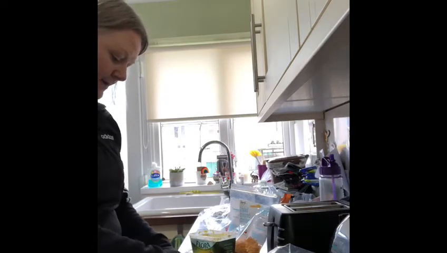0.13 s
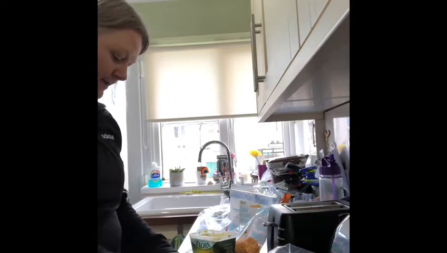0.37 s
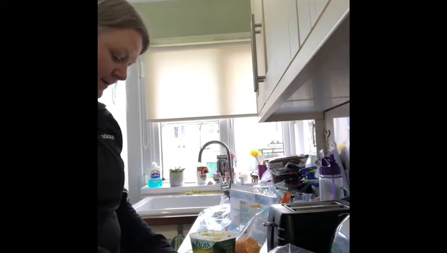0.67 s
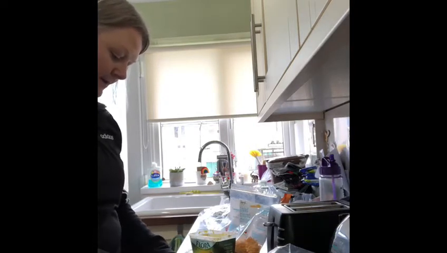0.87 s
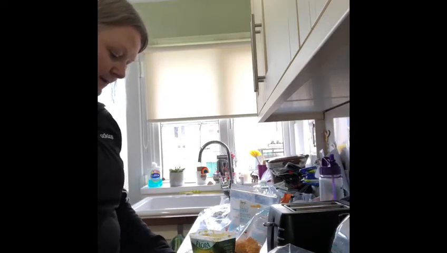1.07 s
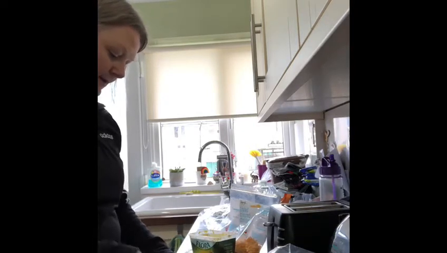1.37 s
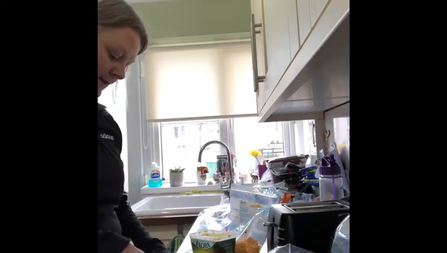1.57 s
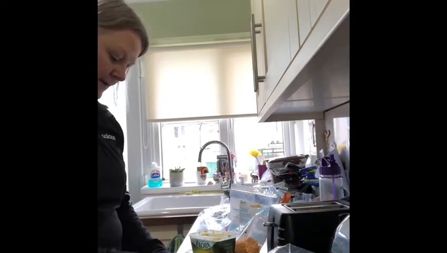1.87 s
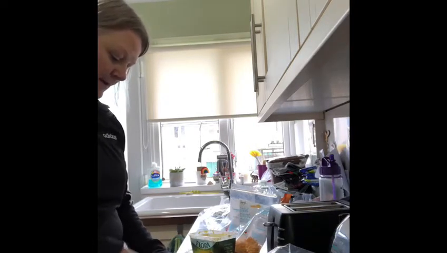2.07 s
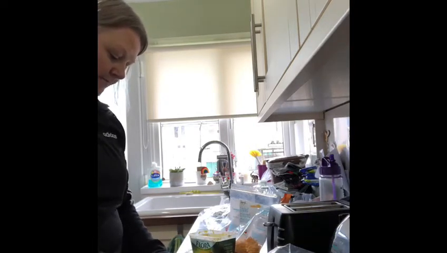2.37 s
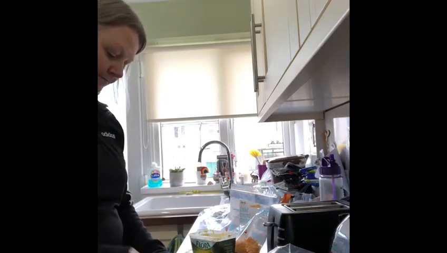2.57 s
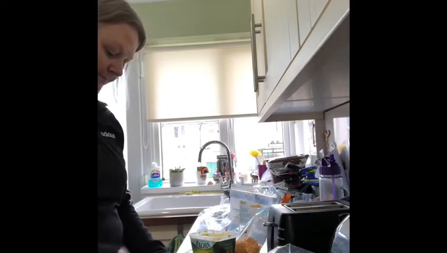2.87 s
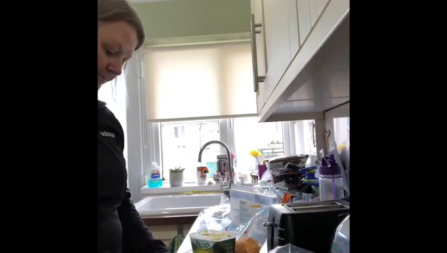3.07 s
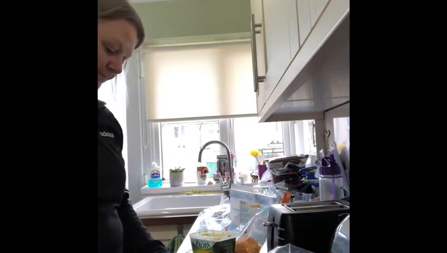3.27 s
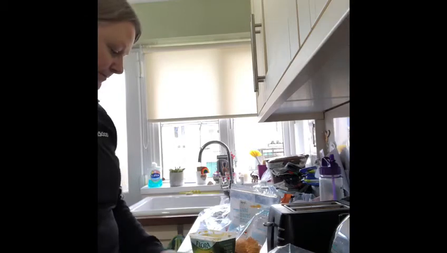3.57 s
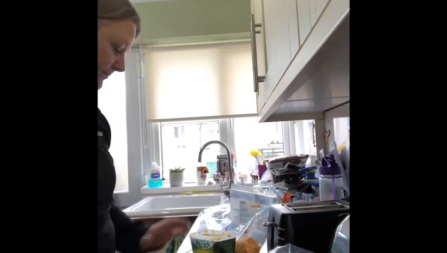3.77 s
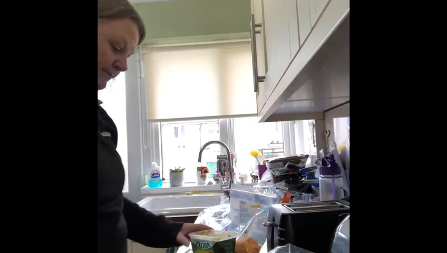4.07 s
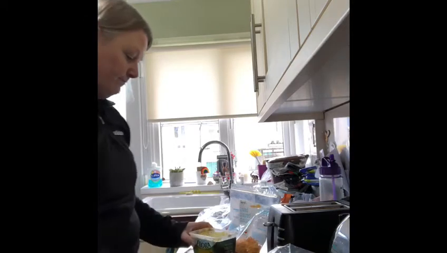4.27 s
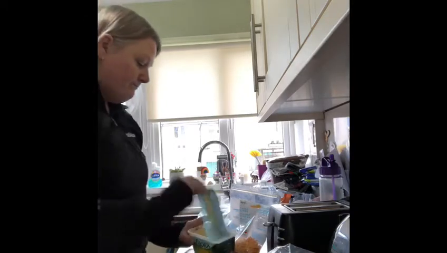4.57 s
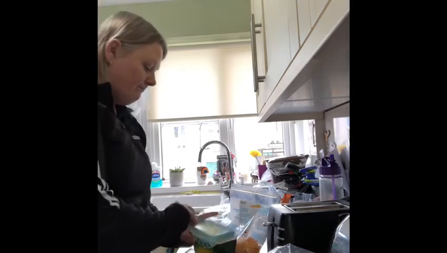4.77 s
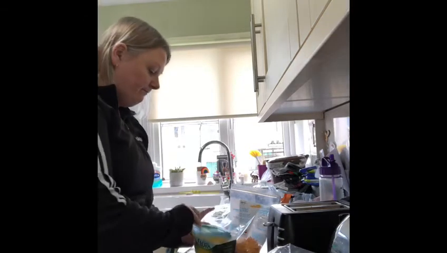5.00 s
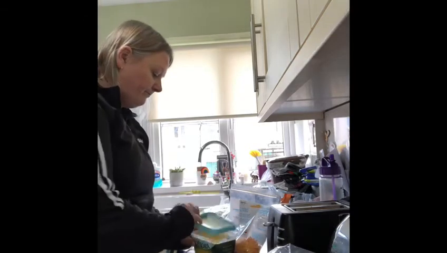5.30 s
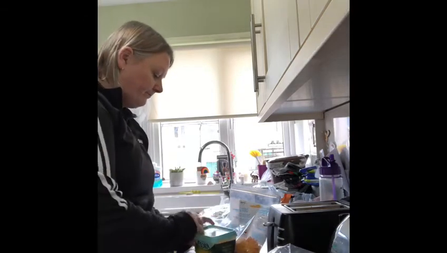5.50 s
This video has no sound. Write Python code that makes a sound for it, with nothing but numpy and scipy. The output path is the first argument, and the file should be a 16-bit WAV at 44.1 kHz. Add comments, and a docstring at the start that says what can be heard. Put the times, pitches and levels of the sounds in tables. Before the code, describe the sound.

Brittle toast crackles under a table knife, stroke after stroke, with small crumb snaps and dull hand thumps on the counter. Two light clinks lead to the knife being put down hard on the plate, the loudest moment. Then a plastic butter tub clicks and creaks, and its lid slides and pops into place. Close microphone, short room reflections, faint steady hush.

```python
"""A table knife spreads butter over dry toast in a small kitchen, close by: the room stays below the direct sound.
Each stroke is a swell of random tiny fractures that breaks crumbs, rings the blade and drums on the worktop.
The blade clinks twice on the plate, then is put down with a clatter: ringing modes over a crack and a thud.
The plastic butter tub is gripped, and its lid is slid over the worktop, fitted and pressed shut:
filtered grains for the rubbing, short chatters and hollow air notes for the clicks, snaps and knocks."""
import sys
import numpy as np
from scipy import signal
from scipy.fft import rfft, irfft
from scipy.io import wavfile
from scipy.ndimage import uniform_filter1d

SR = 44100
rng = np.random.default_rng(int(sys.argv[2]) if len(sys.argv) > 2 else 0)


def persist_wave(psi):
    """Save psi, clipped to +-1, as 16-bit WAV."""
    counts = np.round(np.clip(psi, -1, 1) * 32767).astype(np.int16)
    wavfile.write(sys.argv[1], SR, np.atleast_2d(counts).T)


N = 248707
TIME = np.arange(N) / SR
BLOW_TIME = TIME[:SR // 3]  # longest a single blow may last

# Strokes of the knife, levels at full pressure; softening is the fall of the crust as butter coats it:
# start_s, attack_s, hold_s, release_s, crust_db, softening_db_per_s, crumbs_db, plate_db, whistle_db
KNIFE_STROKES = [ (0.0, 0.00069, 0.003, 0.047, -44, 30, -45.5, -55.5, -58.5),
                 (.21, 0.053, 0.13, 0.045, -41.5, 62, -49, -57.5, -67),
                 (0.576, .055, 0.078, 0.11, -42, 49, -47, -53, -63),
                 (0.94, 0.051, .10, .06, -50, 2, -52, -54.5, -66),
                 (1.276, .12, 0.039, .02, -65, 0, -74.5, -62, -92),
                 (1.442, 0.017, 0.14, 0.037, -49.5, -10, -50.5, -58.5, -65),
                 (1.816, 0.0099, 0.025, 0.078, -41.5, 46, -51, -55.5, -59),
                 (1.898, 0.048, 0.077, 0.074, -54.5, 10, -57.5, -59.5, -68),
                 (2.243, 0.0021, 0.061, 0.039, -47.5, 30, -55, -59, -60),
                 (2.31, 0.034, 0.014, 0.1, -52, 30, -57, -59.5, -69),
                 (2.604, .003, 0.12, 0.09, -62, 25, -66.5, -65, -76),
                 (3.035, 0.0054, 0.0066, 0.032, -55, 25, -58, -56, -68),
                 (3.127, .04, 0.0085, .005, -63, 0, -67, -69, -79)]
# Colour of the breaking crust: pitch_hz, level_db
CRUST_COLOUR = [(200, -37.5), (600, -15.5), (1000, -9), (1250, 1.5), (1900, -2), (2500, 1), (3400, -0.5),
                (5000, -7.5), (8000, -22), (12000, -34)]
# Colour of its finest crumbs: pitch_hz, level_db
CRUMB_COLOUR = [(1000, -42.5), (3000, 1.5), (4900, 5.5), (6500, 0), (8400, -2.5), (9300, -5.5),
                (11300, -10), (12500, -19)]
# Colour of the worktop, heard in strokes, thumps and clinks: pitch_hz, level_db
WORKTOP_COLOUR = [(25, -39), (42, -5.5), (58, -1.5), (85, -10), (120, 0.5), (190, -1), (290, -12.5),
                  (500, -19.5), (1500, -53)]
# Colour of the plate under the toast: pitch_hz, level_db
PLATE_BODY_COLOUR = [(150, -17), (320, -11), (440, 2.5), (660, 1.5), (900, 6), (1100, -4), (2000, -33)]
# Thin whistle of the blade's edge: pitch_hz, level_db
WHISTLE_COLOUR = [(9000, -58), (10600, -12), (11080, 4), (11500, -37), (12500, -39)]
# Worktop rumble at a firm crust level, its share of the crust's dB, and its swell as the hand leans in
RUMBLE_DB, FIRM_CRUST_DB, RUMBLE_SHARE, LEANING_DB_PER_S = -62, -45, .35, 36


def buttering():
    """The blade breaks crust and crumbs in uneven catches, and shakes plate and worktop through the toast."""
    crust = crumbs = rumble = body = whistle = 0
    for *move, crust_db, softening_db_per_s, crumbs_db, plate_db, whistle_db in KNIFE_STROKES:
        rumble_db = RUMBLE_DB + RUMBLE_SHARE * (crust_db - FIRM_CRUST_DB)
        crust = crust + contact(move, crust_db, -softening_db_per_s)
        crumbs = crumbs + contact(move, crumbs_db)
        rumble = rumble + contact(move, rumble_db, LEANING_DB_PER_S)
        body = body + contact(move, plate_db)
        whistle = whistle + contact(move, whistle_db)

    catches = undb(1.96 * wander(rate=130))  # the edge sticks and lets go
    fractures = unit(catches * grains(rate=2200, spread_db=2.5))
    extra_dust = catches * grains(rate=7000, spread_db=4.0)
    dust = unit(fractures + 1.17 * extra_dust)

    crunch = crust * unit(colour(fractures, CRUST_COLOUR)) + crumb_snaps()
    crunch = .82 * crunch + .42 * np.std(crunch) * unit(pressed_blade(crunch))
    drumming = rumble * unit(colour(grains(rate=600, spread_db=2), WORKTOP_COLOUR))
    plate = body * unit(colour(fractures, PLATE_BODY_COLOUR))
    fine_crumbs = crumbs * unit(colour(dust, CRUMB_COLOUR))
    edge = whistle * unit(colour(dust, WHISTLE_COLOUR))
    return crunch + drumming + plate + fine_crumbs + edge


# Larger bits of crust give way, levels before the blade's ring is mixed in: start_s, level_db
CRUST_SNAPS = [(0.212, -50), (0.2303, -47), (.284, -45), (.6428, -42), (0.6797, -53), (.829, -56),
               (0.9375, -65), (0.953, -51), (1.0107, -55), (1.0792, -50.5), (1.335, -58), (1.448, -59.5),
               (1.573, -49), (2.254, -44), (2.609, -55)]
SNAP_DUST_DB = -13  # fine crumbs that fly with a snap, relative to it


def crumb_snaps():
    """A larger bit breaks with one sharp touch and a very short chatter, throwing fine crumbs."""
    out = np.zeros(N)
    for s, db in CRUST_SNAPS:
        snap = impact(0.0033, first=0.82)
        add(out, s, blow(colour(snap, CRUST_COLOUR), db))
        add(out, s, blow(colour(snap, CRUMB_COLOUR), db + SNAP_DUST_DB))
    return out


# Blade and plate, damped by the toast pressed between them: pitch_hz, width_hz, level_db
PRESSED_MODES = [(1580, 21, -19), (1747, 110, 6.5), (1948, 29, 0), (2070, 62, 3.5), (2440, 280, 3.5),
                 (3135, 26, -7.5), (5030, 99, -18)]


def pressed_blade(crunch):
    """Every fracture rings the damped blade; as the contact travels, its modes swell independently."""
    ring = 0
    for mode in PRESSED_MODES:
        swell = undb(4 * wander(rate=14))
        ring = ring + convolve(crunch, resonances([mode])) * swell
    return ring


# The weight of the hand comes down on the worktop: start_s, level_db
HAND_THUMPS = [(0.701, -48), (0.939, -47.5), (2.32, -45), (2.62, -48), (3.049, -46), (4.017, -42.5)]


def hand_thumps():
    """The worktop answers the weight of the hand with a dull swell."""
    out = np.zeros(N)
    for s, db in HAND_THUMPS:
        add(out, s, thud(WORKTOP_COLOUR, db))
    return out


# Knife touches the plate, place 0 tip, 1 edge, 2 flat; chatter is that of the crack:
# start_s, place, clank_db, crack_db, thud_db, chatter_t60_s
PLATE_CLINKS = [(2.7814, 0, -37, -41.5, -57.5, 0.059), (3.1814, 1, -35, -37.5, -53.5, 0.02),
                (3.538, 2, -49, -52.5, -64, 0.068), (3.5487, 2, -24, -20, -40, 0.065),
                (3.5654, 2, -21.5, -28, -38, 0.052), (3.5744, 2, -29, -29.5, -54.5, 0.042)]
# Dry crack of steel on the plate: pitch_hz, level_db
CRACK_COLOUR = [(150, -25.5), (300, -19), (500, 3), (900, 3.5), (1300, 0), (2400, 2), (4200, 4),
                (5200, -9.5), (7500, -18), (9400, -10), (10200, -34), (11400, -33.5)]
FREE_RING_DB = -3  # ringing after the two part, relative to the clank


def knife_on_plate(touching_width_hz=110):
    """Steel chatters on the plate: a dry crack, a clank damped by touching, free ringing and a thud."""
    out = np.zeros(N)
    modes = np.array(PLATE_MODES)
    for s, place, clank_db, crack_db, thud_db, chatter_t60 in PLATE_CLINKS:
        mode_db = modes[:, 2 + int(round(place))]
        damped = resonances([(hz, touching_width_hz, db) for hz, db in zip(modes[:, 0], mode_db)])
        clank = convolve(impact(2.1 * chatter_t60, first=0.2), damped)
        crack = colour(impact(chatter_t60, first=0.18), CRACK_COLOUR)
        add(out, s, blow(plate_ring(mode_db), clank_db + FREE_RING_DB))
        add(out, s, blow(clank, clank_db))
        add(out, s, blow(crack, crack_db))
        add(out, s, thud(WORKTOP_COLOUR, thud_db))
    return out


# Blade and plate together, clean t60 before butter shortens it; levels depend on where they touch:
# pitch_hz, t60_s, tip_db, edge_db, flat_db
PLATE_MODES = [ (427.7, 0.13, -24, -25, -4), (663, 0.034, -2, 6.5, -12.5), (803, .14, 6, -1, -16.5),
               (930, 0.18, -23, -2.5, -10), (968, .14, -28, -19, -5.5), (1400, 0.082, -21, -9, -8.5),
               (1586, 0.092, 7, -10, -16), (1890, 0.23, -25, -1, -12.5), (2080, 0.087, -33, -13, -6),
               (2400, 0.14, -19, -22, -5.5), (2800, 0.35, -7, -26, -32.5), (3118, 0.071, -17, 4.5, 2),
               (3100, 0.047, 8, -13, -9.5), (3170, .19, 1, -11, -10.5), (3380, .13, -12, 4.5, -22.5),
               (3500, .13, -24, -32, -31.5), (4090, .15, -10, -23, -4.5), (4320, .11, -31, -9, -9.5),
               (4370, 0.15, -26, -21, -13), (4450, .19, -11, -12, -5), (5820, 0.091, 2.5, -4, -12.5),
               (5960, 0.11, -24, 1.5, 3), (6030, 0.081, 2, -1, -13.5), (7000, .15, -6, 1, -4),
               (7680, 0.21, -26, -2, -3.5), (8500, 0.11, -28, -34, -9), (9000, .14, -30, -9, -10),
               (9490, 0.21, -10, -2, -9.5), (11000, 0.1, -34, -6, -17.5), (11360, 0.12, -30, -3, -9.5)]


def plate_ring(mode_db, split_hz=40, twin_db=-6, loss_hz=28000):
    """Free ringing: each mode beats against a weaker twin at most split_hz away."""
    ring = 0
    for (hz, t60, *_), db in zip(PLATE_MODES, mode_db):
        pair_hz = hz + np.array([0, split_hz * rng.uniform(-1, 1)])
        phases = np.outer(pair_hz, BLOW_TIME) + rng.random((2, 1))
        main, twin = np.sin(2 * np.pi * phases)
        buttered_t60 = t60 / (1 + hz / loss_hz)  # butter damps the high modes most
        ring = ring + undb(db) * fade(buttered_t60) * (main + undb(twin_db) * twin)
    return ring * (1 - fade(.006))


# The wall of the tub clicks as fingers tighten on it: start_s, level_db
TUB_WALL_CLICKS = [(4.0138, -62), (4.024, -56), (4.0342, -41.5), (4.044, -54), (4.0777, -50), (4.092, -55),
                   (4.1046, -42), (4.1198, -53)]
# What a click sets off: air pitch, hollow note and rim relative to the click, chatter
CLICK_CAVITY_HZ, CLICK_HOLLOW_DB, CLICK_RIM_DB, CLICK_T60_S = 1320, 2.5, -25, 0.01


def wall_clicks():
    """Thin plastic ticks under the fingers, with a trace of rim and a hollow note of the air inside."""
    out = np.zeros(N)
    for s, db in TUB_WALL_CLICKS:
        add(out, s, plastic(TICK_COLOUR, CLICK_T60_S, db))
        add(out, s, plastic(RIM_COLOUR, CLICK_T60_S, db + CLICK_RIM_DB))
        add(out, s, hollow_note(CLICK_CAVITY_HZ, CLICK_T60_S, db + CLICK_HOLLOW_DB))
    return out


# The rim of the lid catches and snaps; chatter is that of the plastic:
# start_s, cavity_hz, snap_db, hollow_db, chatter_t60_s
LID_RIM_SNAPS = [(4.525, 1180, -34, -43.5, 0.031), (4.53, 467, -42.5, -42, 0.056),
                 (4.5412, 460, -31.5, -44, 0.023), (4.714, 1130, -43, -48.5, 0.056),
                 (4.9555, 870, -46.5, -53, 0.021), (5.004, 856, -44, -44.5, 0.029),
                 (5.021, 920, -44.5, -44.5, 0.083), (5.0398, 850, -43, -47, 0.035),
                 (5.3373, 950, -44, -34.5, 0.017), (5.3558, 845, -37, -39.5, .022)]
# Base of the tub on the worktop, also heard under the knocks: pitch_hz, level_db
TUB_BASE_COLOUR = [(30, -47.5), (60, -16), (100, -8), (150, 1.5), (250, -3.5), (400, -21), (1500, -50)]
SNAP_TICK_DB, SNAP_THUD_DB = -4.5, -14  # tick relative to the snap, thud relative to the hollow note


def rim_snaps():
    """The rim snaps and ticks, pushes the air in the tub and jolts its base."""
    out = np.zeros(N)
    for s, cavity_hz, db, hollow_db, chatter_t60 in LID_RIM_SNAPS:
        add(out, s, plastic(RIM_COLOUR, chatter_t60, db))
        add(out, s, plastic(TICK_COLOUR, chatter_t60, db + SNAP_TICK_DB))
        add(out, s, hollow_note(cavity_hz, chatter_t60, hollow_db))
        add(out, s, thud(TUB_BASE_COLOUR, hollow_db + SNAP_THUD_DB))
    return out


# The lid knocks softly on the tub; chatter is that of the plastic:
# start_s, cavity_hz, level_db, chatter_t60_s
SOFT_KNOCKS = [(4.6131, 1010, -48, 0.012), (4.6626, 1070, -47.5, 0.06), (4.7395, 940, -41, 0.12),
               (5.1901, 1287, -62.5, 0.027), (5.3038, 1100, -42.5, .02), (5.367, 725, -40, 0.058),
               (5.381, 694, -39.5, 0.054), (5.4884, 690, -43, 0.055), (5.5318, 970, -47, .023),
               (5.552, 680, -47, 0.026)]
KNOCK_TICK_DB, KNOCK_THUD_DB = -6, -10.5  # relative to the knock
SEATED_S, SEATED_TICK_DB = 5.1, -21  # from here the lid is seated and knocks tick far less


def lid_knocks():
    """A soft knock is mostly a hollow note of the air, with some tick and a thud of the base."""
    out = np.zeros(N)
    for s, cavity_hz, db, chatter_t60 in SOFT_KNOCKS:
        tick_db = KNOCK_TICK_DB if s < SEATED_S else SEATED_TICK_DB
        add(out, s, hollow_note(cavity_hz, chatter_t60, db))
        add(out, s, plastic(TICK_COLOUR, chatter_t60, db + tick_db))
        add(out, s, thud(TUB_BASE_COLOUR, db + KNOCK_THUD_DB))
    return out


# Tick of thin plastic: pitch_hz, level_db
TICK_COLOUR = [(200, -5.5), (700, -2), (1500, -11), (1800, 14.5), (2150, -23.5), (2950, 10.5), (3300, -10),
               (3750, 5.5), (4300, -1.5), (5500, 3.5), (7600, 2.5), (9000, -4.5), (12000, -10.5)]
# Snap of the rim: pitch_hz, level_db
RIM_COLOUR = [(1000, -24.5), (2500, -13), (3700, -8), (4200, -6.5), (4520, -3), (4900, -2), (5250, -6.5),
              (5850, -7), (7000, -19.5), (12000, -26)]


def plastic(spectrum, chatter_t60, db):
    """A brief chatter of thin plastic."""
    return blow(colour(impact(chatter_t60, first=0.19), spectrum), db)


# Air in the tub: multiple of cavity_hz, width_hz, level_db
CAVITY_MODES = [(.72, 180.4, -9.5), (1, 228, 16), (1.7, 300, -2)]
# A soft fingertip passes little treble to that air: pitch_hz, level_db
SOFT_PUSH_COLOUR = [(150, -0.5), (500, -3.5), (1700, -7.5), (3000, -11), (8000, -16)]


def hollow_note(cavity_hz, chatter_t60, db):
    """The air in the tub answers a push with a short hollow note."""
    cavity = resonances([(ratio * cavity_hz, width, mode_db) for ratio, width, mode_db in CAVITY_MODES])
    push = impact(1.36 * chatter_t60, first=0.26)
    return blow(convolve(push, colour(cavity, SOFT_PUSH_COLOUR)), db)


# Fingers tighten on the tub: start_s, attack_s, hold_s, release_s, level_db
GRIP_MOVES = [(4.034, 0.0018, 0.053, 0.098, -47)]
# Fingers creaking on the wall of the tub: pitch_hz, level_db
CREAK_COLOUR = [(200, -6), (1000, -16), (1230, 3), (1520, -13), (1700, -21), (1950, 0), (2100, 8),
                (2300, 7), (2500, -15), (7500, -9.5), (12000, -19)]


def finger_creak():
    """Fingers creak on the tub in sparse grains of friction."""
    return moves(GRIP_MOVES) * unit(colour(grains(rate=900, spread_db=-5.0), CREAK_COLOUR))


# The lid slides over the worktop: start_s, attack_s, hold_s, release_s, level_db
SLIDE_MOVES = [(3.925, 0.013, 0.014, 0.069, -58.5), (4.135, 0.11, .115, 0.12, -45.5)]
# Hiss of the sliding lid: pitch_hz, level_db
HISS_COLOUR = [(120, -21), (270, -32.5), (400, -0.5), (520, -6.5), (690, -15), (1200, -6), (1500, -12),
               (1950, -11), (2400, -10.5), (3500, -3), (4200, -5), (5300, -6), (8100, -12.5), (12000, -26)]
# Lid and worktop ring faintly while it slides: pitch_hz, width_hz, level_db
SLIDE_RING_MODES = [(406, 60, -17), (520, 22, -12), (1194, 25, -3.5), (2330, 70, -4), (3430, 150, 1),
                    (4650, 240, 5), (5220, 160, 4.5)]


def lid_slide():
    """The lid hisses over the worktop; dense grains of friction also ring both faintly."""
    drag = grains(rate=9000, spread_db=1.5)
    hiss = unit(colour(drag, HISS_COLOUR))
    ring = unit(convolve(drag, resonances(SLIDE_RING_MODES)))
    return moves(SLIDE_MOVES) * unit(1.03 * hiss + .5 * ring)


# The lid is worked round the rim: start_s, attack_s, hold_s, release_s, level_db
FITTING_MOVES = [(4.662, 0.0092, 0.038, .04, -49.5), (4.74, 0.0097, 0.028, 0.036, -48),
                 (4.826, 0.037, 0.011, 0.035, -38.5), (4.897, .012, .008, 0.029, -49.5),
                 (4.935, 0.018, 0.0041, 0.032, -46.5), (5.305, 0.035, .01, 0.026, -42.5)]
# The lid rubbing on the tub: pitch_hz, level_db
RUB_COLOUR = [(90, -21), (280, -10), (500, -4.5), (680, -2.5), (1000, 2.5), (1200, -6.5), (1400, -15),
              (3000, -16), (7500, -18), (9000, -26), (12000, -38)]


def lid_rub():
    """The lid rubs on the rim with a coarser, hollow grain."""
    return moves(FITTING_MOVES) * unit(colour(grains(rate=2800, spread_db=1.0), RUB_COLOUR))


def kitchen(x, early_db=-7, early_t60=0.082, late_db=-10.0, late_t60=0.36, treble_t60=0.3):
    """Worktop and cupboards answer at once; the room rings a little longer, its treble dying first."""
    early, low, high = rng.standard_normal((3, len(BLOW_TIME)))
    sparse = rng.random(len(BLOW_TIME)) < .03
    early = early * sparse * fade(early_t60) * (1 - fade(0.0067))
    early = colour(early, [(150, -14), (900, 2)])  # small surfaces return little bass
    low = colour(low, [(100, -2), (1000, -0.5), (3000, -2), (8000, -14.0)]) * fade(late_t60)
    high = colour(high, [(1500, -23.0), (5000, -0.5), (11000, -5)]) * fade(treble_t60)
    late = (low + high) * (1 - fade(0.015))
    response = undb(early_db) * early / np.linalg.norm(early)
    response = response + undb(late_db) * late / np.linalg.norm(late)
    return x + convolve(x, response)


# Colour of the quiet kitchen: pitch_hz, density_db_per_hz
AMBIENCE_COLOUR = [(18, -45), (30, -7), (212, 3), (907, -4), (1290, -8), (1970, -9), (2670, -13),
                   (3100, -12), (7270, -17.5), (11100, -23.5), (12000, -44), (15600, -60), (22000, -120)]
AMBIENCE_DB = -67.5


def kitchen_hush():
    """The faint steady hush of the kitchen: coloured noise."""
    return undb(AMBIENCE_DB) * unit(colour(rng.standard_normal(N), AMBIENCE_COLOUR))


def undb(db):
    """Decibels to gain."""
    return 10 ** (np.asarray(db) / 20)


def unit(x):
    """Scale to rms 1."""
    return x / np.sqrt(np.mean(x ** 2))


def blow(x, db):
    """Scale a short sound to the energy of 10 ms at this level."""
    return x * undb(db) * np.sqrt(.01 * SR / np.sum(x ** 2))


def fade(t60):
    """Exponential decay over the length of a blow, falling 60 dB in t60 seconds."""
    return np.exp(-np.minimum(np.log(1000) * BLOW_TIME / max(t60, 1e-4), 30))


def convolve(x, response):
    """Pass x through a response, keeping its length."""
    return signal.oaconvolve(x, response)[:len(x)]


def colour(x, points, size=4096):
    """Causal minimum-phase filter whose gain follows (Hz, dB) points."""
    hz, db = np.transpose(points)
    bins = np.maximum(np.arange(size // 2 + 1) * SR / size, 1)
    gain = undb(np.interp(np.log(bins), np.log(hz), db))
    cepstrum = irfft(np.log(gain))
    cepstrum[1:size // 2] *= 2  # fold the cepstrum forward in time
    cepstrum[size // 2 + 1:] = 0
    return convolve(x, irfft(np.exp(rfft(cepstrum))))


def resonances(modes, size=2048):
    """Impulse response of damped (Hz, width Hz, dB) modes."""
    t = BLOW_TIME[:size]
    return sum(undb(db) * np.exp(-np.pi * width * t) * np.cos(2 * np.pi * hz * t) for hz, width, db in modes)


LANDING_DB, LIFT_OFF_DB = -11, -19  # pressure at landing and lift-off, relative to full


def contact(move, db, slope_db_per_s=0):
    """Gain of one rubbing move: it lands, bears down, holds and lifts; it may drift once fully down."""
    start, *stages = move
    s = start + np.cumsum([0, *np.abs(stages)])
    pressure_db = np.interp(TIME, s, [LANDING_DB, 0, 0, LIFT_OFF_DB])
    drift_db = slope_db_per_s * (np.clip(TIME, s[1], s[-1]) - s[1])
    touching = 1. * ((TIME >= s[0]) & (TIME <= s[-1]))
    return undb(db + pressure_db + drift_db) * uniform_filter1d(touching, size=64)


def moves(table):
    """Gain of a series of rubbing moves."""
    return sum(contact(move, db) for *move, db in table)


def grains(rate, spread_db):
    """Tiny fractures at random moments, rate a second on average, of random size and sign; rms 1."""
    sizes = undb(spread_db * np.minimum(rng.exponential(size=N), 4))
    return unit((rng.random(N) < rate / SR) * sizes * rng.choice([-1, 1], N))


def wander(rate):
    """Smooth chance with about rate turns a second, scaled to rms 1."""
    knots = np.arange(0, TIME[-1] + 1, 1 / rate)
    path = np.interp(TIME, knots, rng.standard_normal(len(knots)))
    return unit(uniform_filter1d(path, size=256))


def impact(t60, first):
    """A first touch of the given size, followed by a dying chatter."""
    push = rng.standard_normal(len(BLOW_TIME)) * fade(t60)
    push /= np.linalg.norm(push)
    push[0] = first
    return push


def thud(spectrum, db):
    """A heavy support answers a blow with a dull, slower swell."""
    swell = fade(0.16) - fade(0.052)
    return blow(colour(rng.standard_normal(len(BLOW_TIME)) * swell, spectrum), db)


def add(track, s, sound):
    """Mix a sound into the track at s seconds."""
    start = int(s * SR)
    track[start:start + len(sound)] += sound[:N - start]


def scene():
    """All the handling sounds in the room, over its faint steady hush."""
    knife = buttering() + hand_thumps() + knife_on_plate()
    tub = wall_clicks() + rim_snaps() + lid_knocks()
    friction = finger_creak() + lid_slide() + lid_rub()
    return (kitchen(knife + tub + friction) + kitchen_hush())[None]


def record(dry):
    """The deepest bass below 38 Hz is thinned, and nothing sounds above about 12.1 kHz."""
    thin = signal.sosfilt(signal.butter(4, 38, "high", fs=SR, output="sos"), dry)
    return signal.sosfilt(signal.ellip(10, .2, 80, 12100, fs=SR, output="sos"), thin)


dry = scene()
out = record(dry)
persist_wave(out)
```